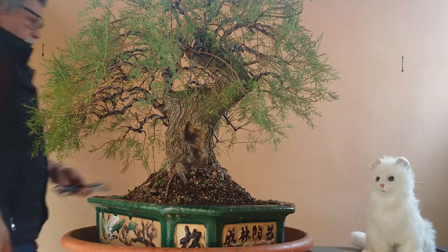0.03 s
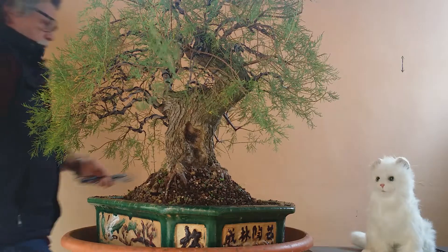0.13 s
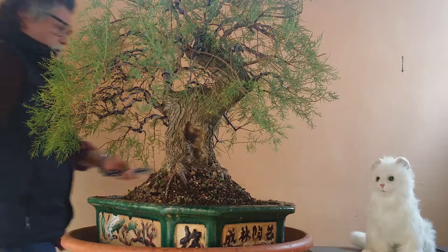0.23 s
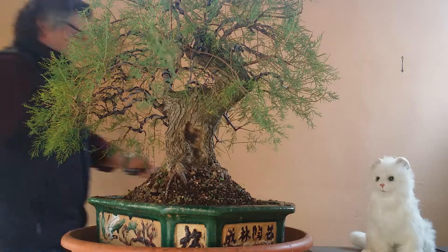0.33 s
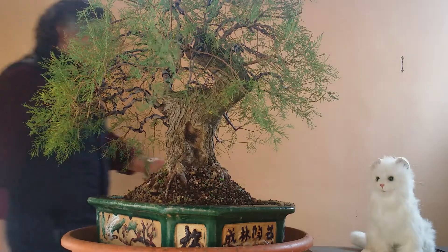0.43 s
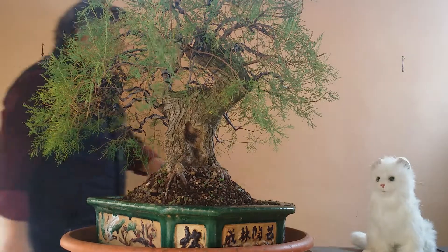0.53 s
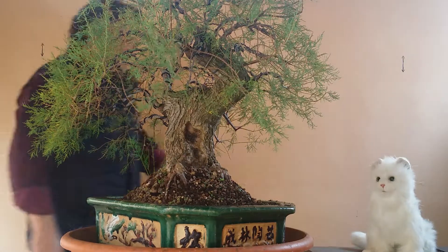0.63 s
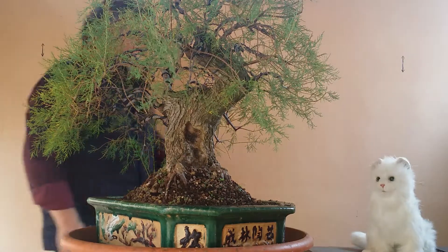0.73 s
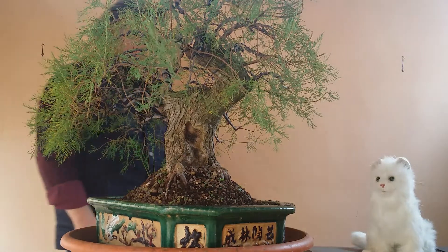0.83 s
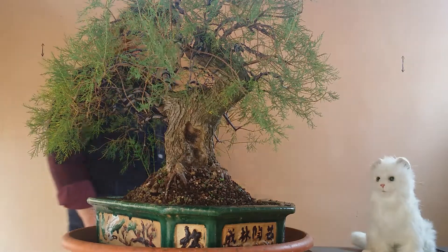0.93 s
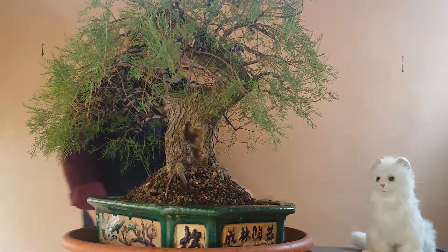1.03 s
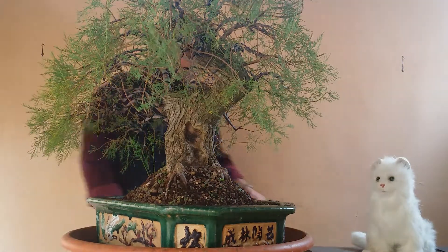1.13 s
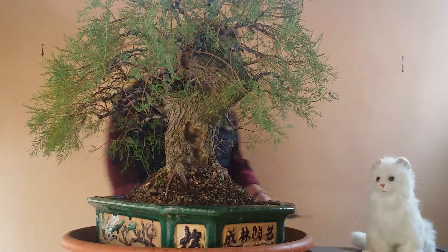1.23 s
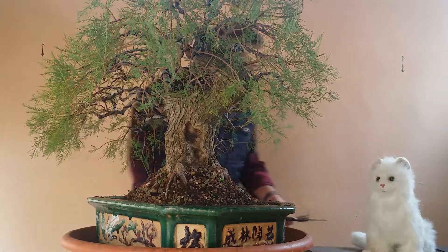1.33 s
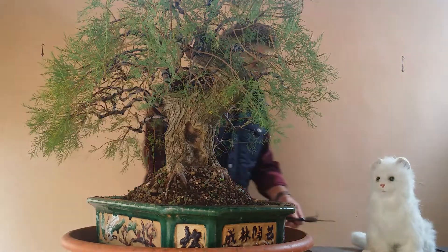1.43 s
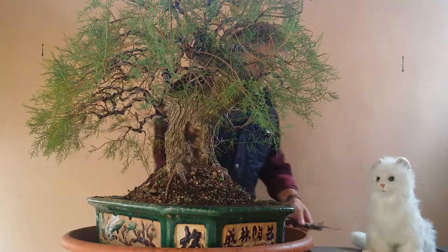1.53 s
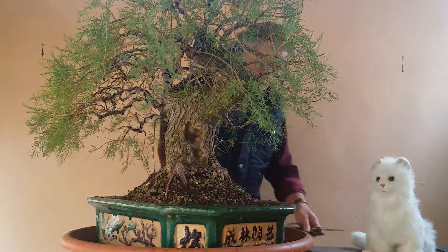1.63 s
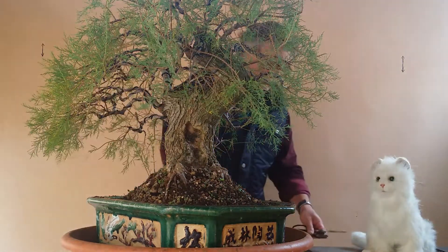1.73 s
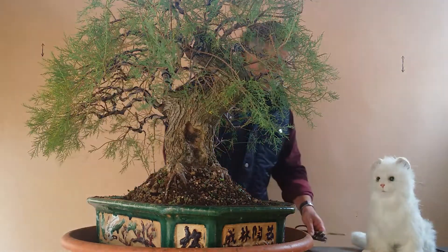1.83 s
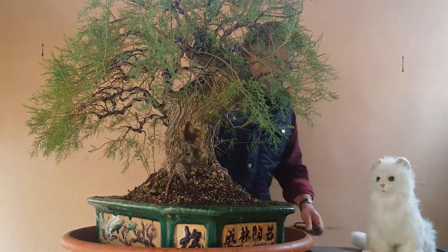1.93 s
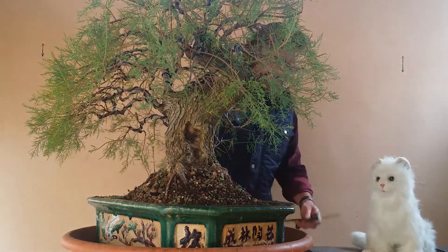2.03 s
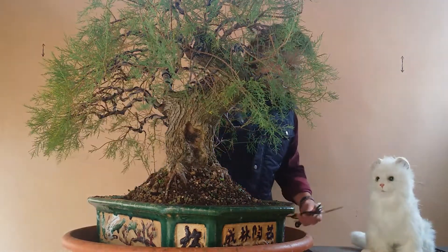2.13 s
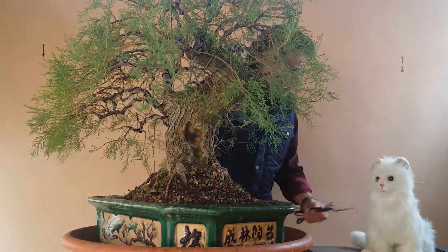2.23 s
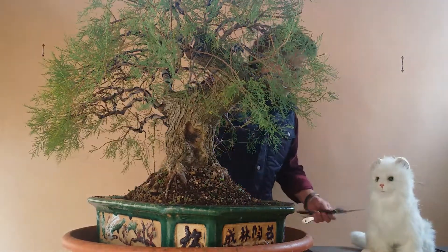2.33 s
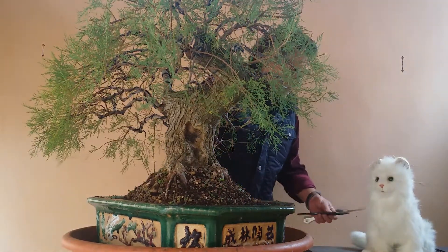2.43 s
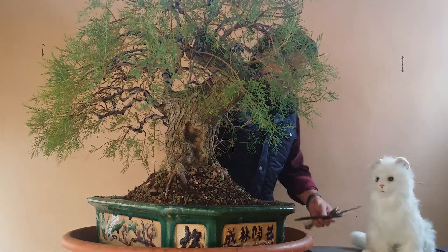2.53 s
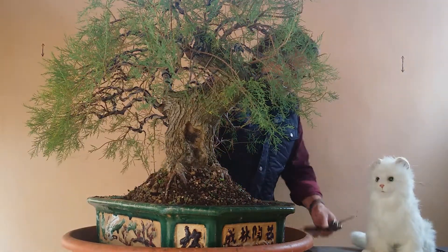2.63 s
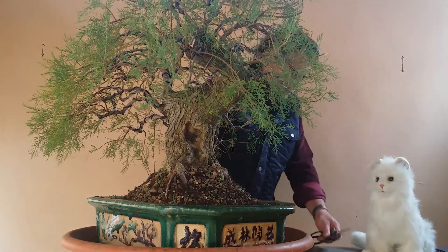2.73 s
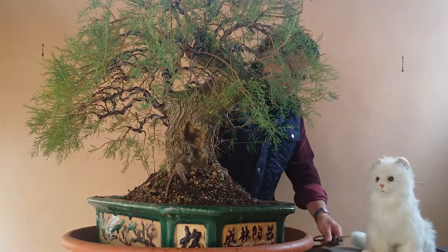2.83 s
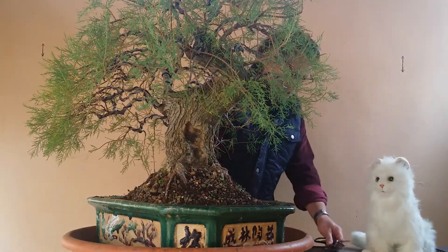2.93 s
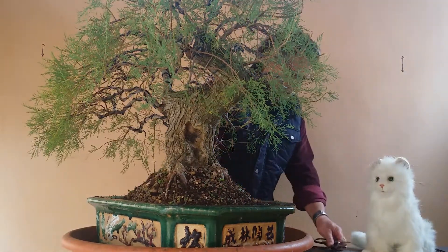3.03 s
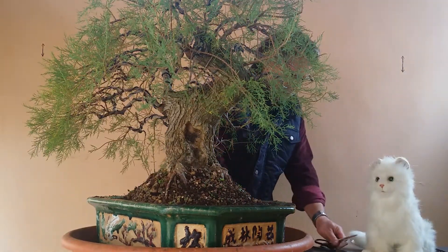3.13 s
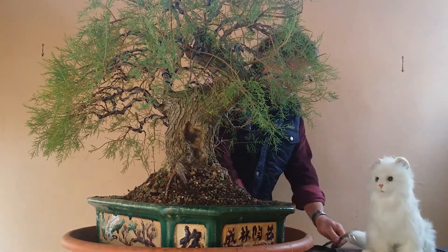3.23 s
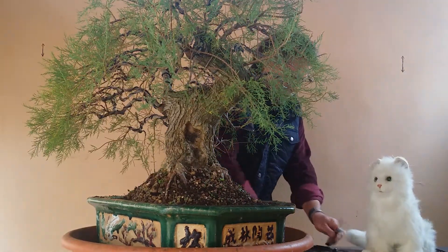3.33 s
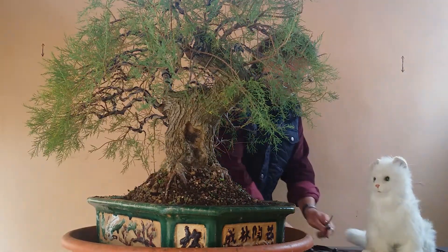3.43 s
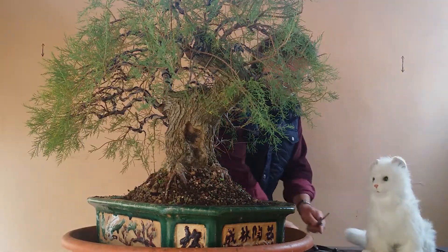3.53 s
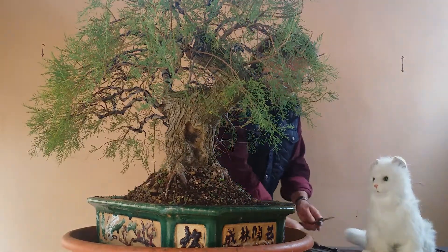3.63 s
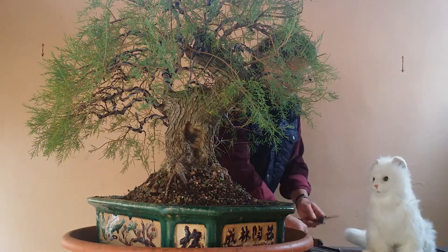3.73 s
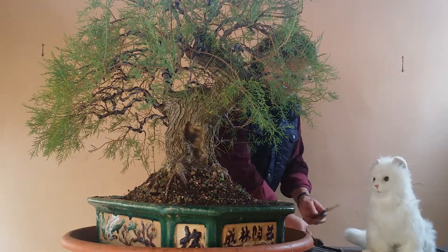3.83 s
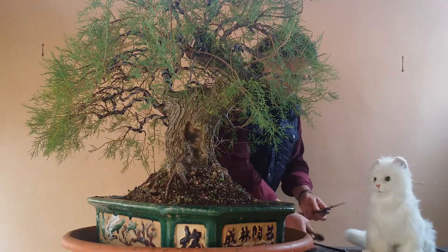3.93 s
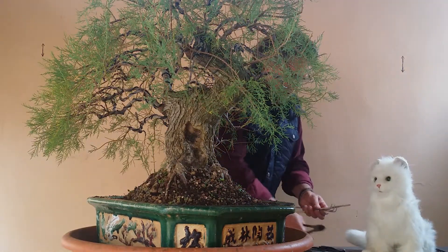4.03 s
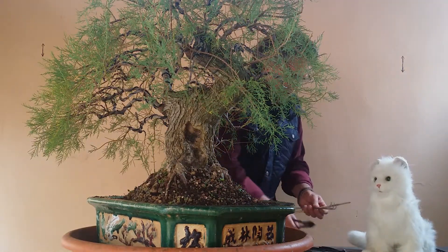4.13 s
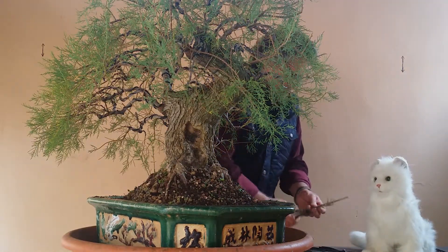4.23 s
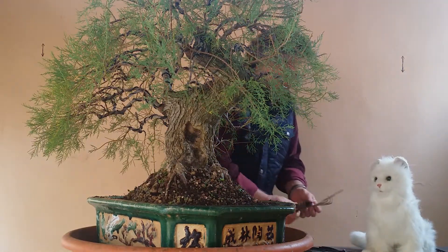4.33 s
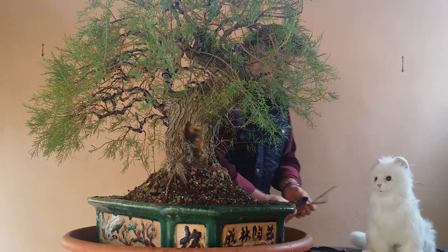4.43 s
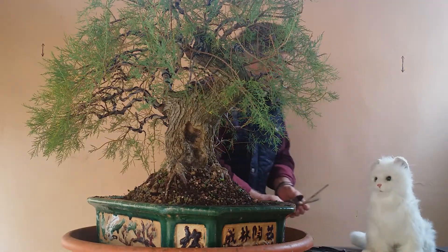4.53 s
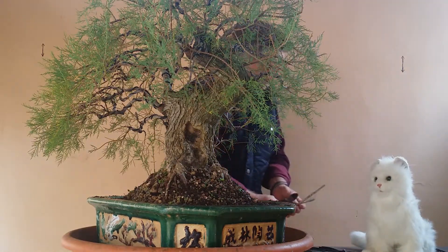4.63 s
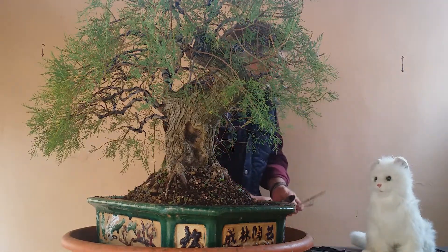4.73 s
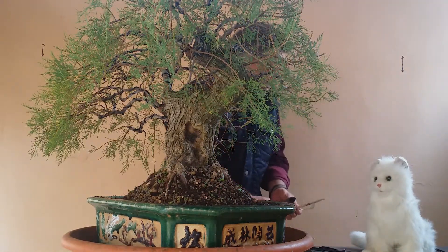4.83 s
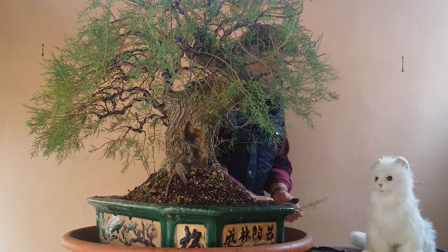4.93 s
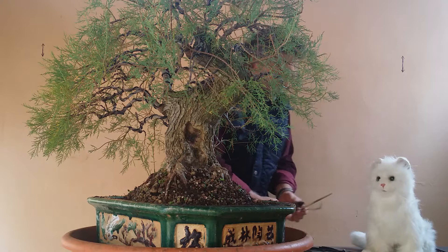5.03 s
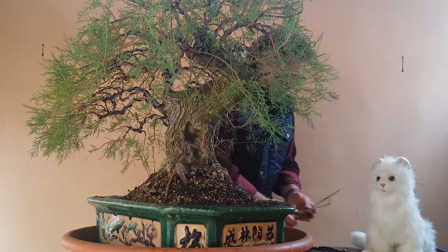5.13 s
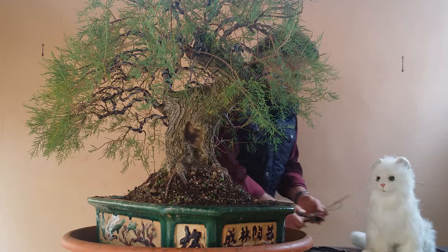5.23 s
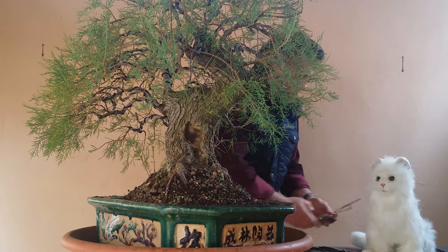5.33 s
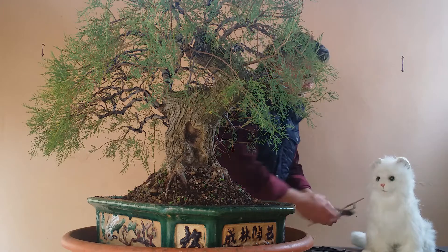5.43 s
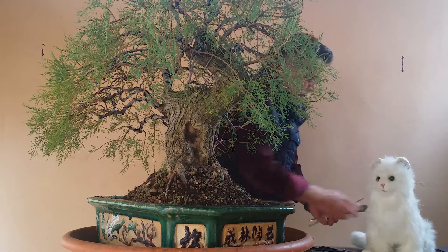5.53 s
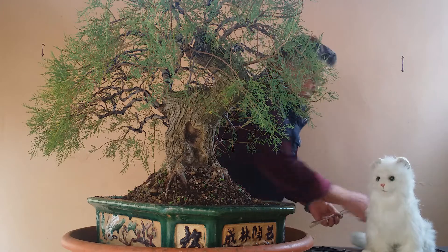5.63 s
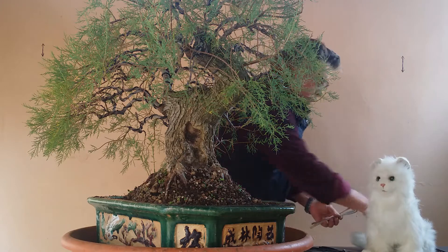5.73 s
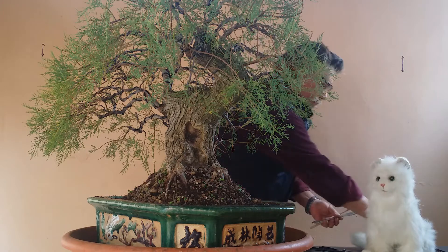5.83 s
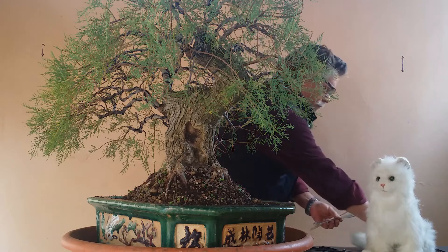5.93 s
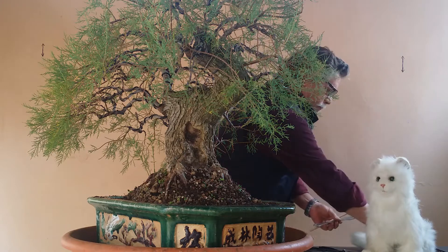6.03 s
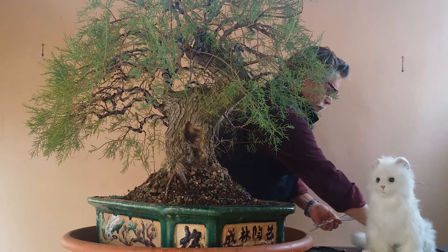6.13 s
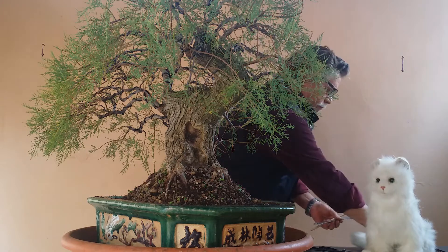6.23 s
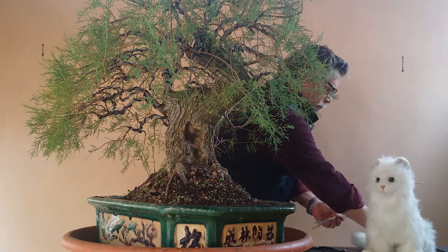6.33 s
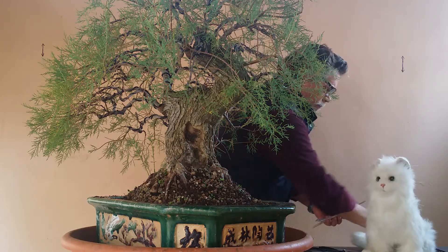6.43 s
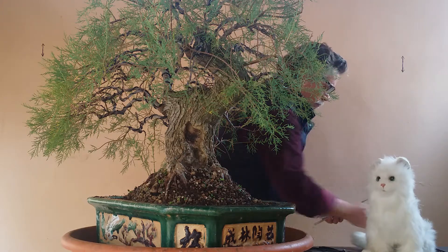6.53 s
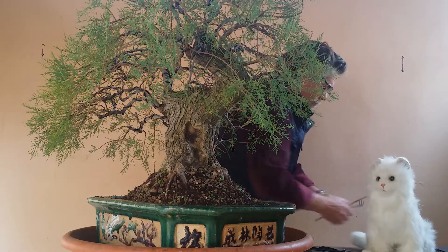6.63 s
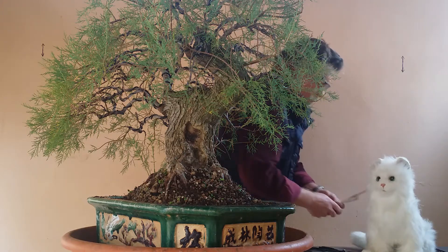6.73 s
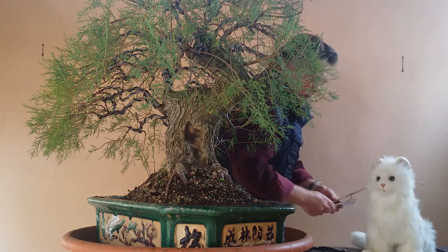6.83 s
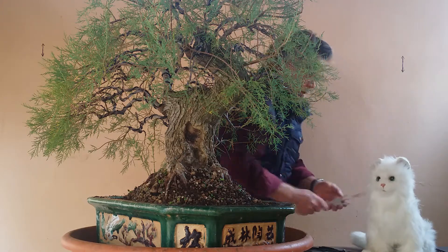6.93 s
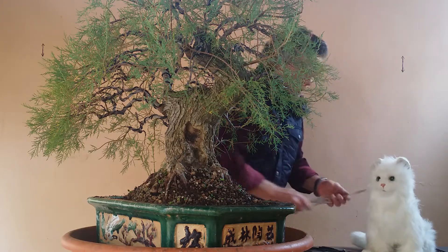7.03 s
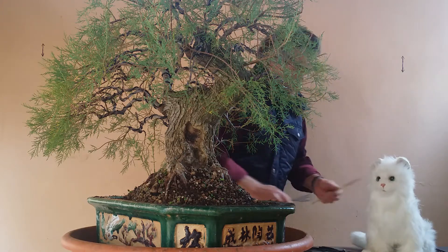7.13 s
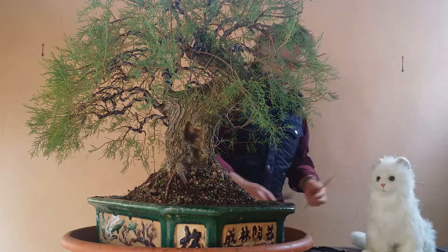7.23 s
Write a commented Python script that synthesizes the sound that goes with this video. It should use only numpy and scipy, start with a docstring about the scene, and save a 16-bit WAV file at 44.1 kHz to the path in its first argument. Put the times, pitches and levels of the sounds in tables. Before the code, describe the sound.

Steel pruning shears clink in the hand, then tools knock and rattle onto a wooden table at uneven gaps, ending with one heavy thud.

```python
"""A small, bare-walled room with a wooden table: steel pruning tools are carried in, picked up and set down.
Blades clink in the hand as damped steel modes; tools knock, chatter and ring the tabletop, one with a heavy thud.
A hand bumps the table and a sleeve rubs the plant pot, as shaped noise with a few singing tones.
Rumble, clothing and hiss run beneath; two spaced microphones hear it all, a little from their right."""
import sys
import numpy as np
from scipy import signal
from scipy.fft import rfft, irfft, next_fast_len
from scipy.io import wavfile
from scipy.ndimage import map_coordinates

SR = 44100
rng = np.random.default_rng(int(sys.argv[2]) if len(sys.argv) > 2 else 0)


def unload_wav(signal):
    """Save mono or channel-first audio to the path in sys.argv[1] as 16-bit WAV at rate SR, clipped to [-1, 1]."""
    wavfile.write(
        sys.argv[1],
        SR,
        np.round(np.clip(np.atleast_2d(signal).T, -1, 1) * 32767).astype(np.int16),
    )


N = 321841
PULSE_SAMPLES = 16384  # length of every struck sound
HZ = np.fft.rfftfreq(PULSE_SAMPLES, 1 / SR)
T_S = np.arange(PULSE_SAMPLES) / SR

# Spectra and mode strengths count only relative to each other: the sounds made from them are normalized.

# Room rumble. Each row: frequency in Hz, density in dB per Hz.
RUMBLE_SPECTRUM = [(12, -36), (20, -14), (37, 1.5), (49, -13.5), (82, 2), (129, -6.5), (178, -3.5),
                   (209, -8.5), (264, -6.5), (370, -13), (450, -16.5), (580, -44), (990, -120)]
# Stir of clothing. Each row: frequency in Hz, density in dB per Hz.
CLOTH_SPECTRUM = [(240, -32), (400, -5), (568, -3.5), (860, -5.5), (980, -4), (2800, -15), (3640, -49),
                  (6160, -120)]
# Steady hiss. Each row: frequency in Hz, density in dB per Hz.
HISS_SPECTRUM = [(1470, -28.5), (2500, -15), (2820, -8.5), (3140, -2.5), (3500, -3), (3610, -2.5),
                 (4750, -2.5), (5620, -5), (6440, 1), (7010, -4), (8740, -7.5), (14900, -13.5),
                 (15500, -15.5)]
# The gardener steps or reaches. Each row: middle in seconds, length in seconds, cloth level in dB.
MOVES = [(0.04, 0.79, -56.5), (0.53, 0.39, -58.5), (1.101, 1.0, -62.5), (3.768, 0.26, -58),
         (3.949, 0.17, -53.5), (4.49, 1, -63)]
RUMBLE_DB, CLOTH_DB, HISS_DB = -58.5, -63, -65.5  # between movements
FOOTFALL_DB, SWISH_DB = 2, -4.5  # rumble and hiss of a movement relative to its cloth

# The shears clink in the hand. Each row: start in seconds, energy in dB.
CLINKS = [(.130, -15), (0.218, -19), (0.834, -21.5), (0.869, -11.5), (1.230, -24.5), (1.674, -27),
          (2.640, -25), (2.880, -31)]
# Modes of the shears' blades. Each row: frequency in Hz, strength in dB, t60 in seconds.
SHEARS_MODES = [(1940, -11.5, .08), (2950, -11, 0.1), (3320, -14.5, .07), (4180, -10, 0.071),
                (5000, -10.5, .08), (5890, 0.5, 0.024), (6940, -10, 0.055), (7700, 1, 0.11),
                (9620, -1, 0.2), (12400, -1.5, .11), (14980, -13, .07)]
# Modes of the scissors' blades. Each row: frequency in Hz, strength in dB, t60 in seconds.
SCISSORS_MODES = [(4770, -15, 0.075), (5530, -6, 0.2), (6890, -2.5, 0.21), (7600, -4, .14),
                  (7680, 2, 0.084), (9170, 0, 0.09), (9950, -6.5, 0.11), (10600, -16, .14),
                  (10850, -2.5, 0.11), (11750, -8, 0.18), (13300, -1.5, 0.13), (14030, -7, .14)]
# A steel edge catching. Each row: frequency in Hz, gain in dB.
EDGE_SPECTRUM = [(300, -23.5), (2000, -14.5), (4000, -4.5), (5500, 2.5), (7400, 0.5), (9000, -4.5),
                 (12000, -8), (15500, -8.5)]
# Ring equals scrape at this energy, and gains this many dB for each dB.
RING_FROM_DB, RING_DB_PER_DB = -14.5, 1.72

# A hand bumps the table. Each row: start in seconds, energy in dB.
BUMPS = [(1.564, -23), (3.544, -14.5), (3.915, -11.5), (4.832, -19.5)]
BUMP_HZ, BUMP_CHATTER, BUMP_BOARD_DB, BUMP_THUD_DB = 720, 2.7, -9.5, -6.5  # soft and dull

# A tool lands on the tabletop. Each row: start in seconds, energy in dB, brightness in Hz,
# chatter amplitude relative to the click, time to settle in seconds, gain per further contact in dB,
# board ring in dB re each contact, table thud in dB re the last contact,
# blade ring in dB re the first contact, tool (0 shears, 1 scissors).
KNOCKS = [ (2.753, -14, 3190, 2.4, .007, 0, 7, -8, -11.5, 0),
          (3.154, -6.5, 1270, 2.1, .015, 0, -2, -4, -8.5, 0),
          (3.251, 3, 2600, 2.2, .0095, 3, -13, -27, -9, 1),
          (3.308, -6.5, 2370, 1.2, .029, -3.5, -3, -1, -8.5, 1),
          (4.055, 5, 3630, 2, .014, -1.6, -9, -11, -4.5, 1),
          (4.095, -2, 2100, 0.71, .012, -1, -6.5, -4, -15.5, 1),
          (6.325, 12, 1700, .05, 0.013, -12, -18, 13, -30, 0),
          (6.3517, 17.5, 2860, 0.12, .022, -3.5, -19.5, -0.5, -30, 0)]
# A hard contact on the wood. Each row: frequency in Hz, gain in dB.
WOOD_SPECTRUM = [(40, -35), (120, -13.5), (290, -9.5), (380, -1.5), (700, -1), (1300, 2.5), (2300, 2.5),
                 (3300, 2), (4600, -0.5), (8000, 0), (15000, -13)]
# Handles clacking on the board. Each row: frequency in Hz, strength in dB, t60 in seconds.
CLACK_MODES = [(748, -4, .24), (959, -2, .24), (1070, -4.5, .2), (1228, 1, 0.23), (1285, -2, 0.19),
               (1466, -8.5, 0.3), (1680, -6.5, .2), (2057, 3, 0.2), (2180, -11, 0.25), (2386, -4.5, .22),
               (2804, -1, 0.16), (3153, 4, 0.22)]
# The tabletop's board. Each row: frequency in Hz, strength in dB, t60 in seconds.
BOARD_MODES = [(123, -14, 0.28), (250.3, -16.5, 0.35), (426, -9, 0.218), (507, 2.5, 0.18),
               (582, -3.5, 0.23), (633.5, -9.5, 0.3), (958, -9, 0.26)]
# The whole table on its legs. Each row: frequency in Hz, strength in dB, t60 in seconds.
THUD_MODES = [(91, -20.5, 0.45), (164, 1, .32), (186, 1.5, .29), (247, -24.5, 0.36), (353.7, -2.5, 0.35),
              (369, -10, 0.27)]
CONTACT_COUNT = 3  # tip, pivot and handles touch in turn
SETTLE_POWER = 1.7  # above 1, the gaps between contacts widen
CHATTER_KEPT = .55  # share left at each further contact
BLADE_LAG_S = .0025  # the blades jolt just after the first contact
SCRAPE_DB, SLIDE_DB = -23.5, 11  # blade scrape re the knock, and its rise per root of chatter

# Cloth rubbing on the pot. Each row: frequency in Hz, density in dB per Hz.
SLEEVE_SPECTRUM = [(150, -10), (400, -3), (1300, -8), (1620, -8), (2000, -8), (3100, -9), (3900, -6),
                   (4700, -9.5), (5180, 1.5), (5500, -8), (6900, -3.5), (8200, -14.5), (12000, -19.5),
                   (15500, -21.5)]
# Narrow tones that sing in the stroke. Each row: frequency in Hz, width in Hz, strength in dB.
SING = [(1630, 66, -1), (5160, 130, 0), (5920, 50, -3)]
SING_DB = -11  # relative to the rubbing
BRUSH_TOUCH_S, BRUSH_ATTACK_S = 4.86, 0.0054  # first touch
BRUSH_FULL_S, BRUSH_HOLD_S, BRUSH_DB = 4.98, 0.067, -44.5  # full pressure
BRUSH_RISE_DB_PER_S, BRUSH_FALL_DB_PER_S = 88, 180

# Echoes off near walls. Each row: right-hand delay in seconds, level in dB re the direct sound,
# left lag in seconds (the left delay is the absolute value of delay plus lag).
WALLS = [(.0053, -1.5, 0.028), (.0075, -9.5, -0.0062), (0.0102, -3.5, -0.01053), (.0131, -9, 0.0075),
         (.0235, -17.5, -0.032)]
# Decay of the room's tail. Each row: frequency in Hz, t60 in seconds.
ROOM_T60 = [(150, 0.74), (500, 0.4), (2000, 0.31), (8000, 0.32), (15000, 0.091)]
MIC_DELAY_S = 0.00046  # sound's travel time between the microphones
SOURCE_LAG_S = 0.00013  # the left microphone hears the table later
BAND_LIMIT_HZ = 15600


def amp(db):
    """Decibels to gain."""
    return 10 ** (np.asarray(db) / 20)


def unit(x):
    """Scaled to rms 1."""
    return x / np.sqrt(np.mean(x ** 2) + 1e-20)


def pulse(x):
    """Scaled to energy 1, averaged over the channels."""
    return x / np.sqrt(np.mean(np.sum(x ** 2, axis=-1)) + 1e-20)


def along(points, hz):
    """Interpolates (Hz, value) points on a log frequency axis."""
    point_hz, value = np.transpose(points)
    return np.interp(np.log(hz + 1), np.log(point_hz + 1), value)


def wobble(rate_hz):
    """A smooth random curve through rate_hz knots a second."""
    knots = rng.standard_normal(int(N * rate_hz / SR) + 4)
    return map_coordinates(knots, [np.arange(N) * rate_hz / SR])


def add(track, start_s, sound):
    """Mixes a sound into the track."""
    start = max(round(start_s * SR), 0)
    track[..., start:start + sound.shape[-1]] += sound[..., :N - start]


def diffuse(size, spectrum=None):
    """Noise from all sides: alike at both microphones in the bass, nearly unrelated in the treble."""
    hz = np.fft.rfftfreq(size, 1 / SR)
    alike = .98 * np.sinc(2 * hz * MIC_DELAY_S)
    colour = 1 if spectrum is None else amp(along(spectrum, hz))
    noise = rfft(rng.standard_normal((2, size)))
    mid, side = noise * colour * np.sqrt([1 + alike, 1 - alike])
    left_late = np.exp(-1j * np.pi * hz * SOURCE_LAG_S)  # half the source lag: leans right
    return irfft([(mid + side) * left_late, mid - side], size)


def rush(spectrum):
    """Steady diffuse noise of rms 1."""
    return unit(diffuse(next_fast_len(N), spectrum)[:, :N])


def click(gain):
    """The shortest causal pulse with this spectrum: minimum phase, by folding the cepstrum."""
    cepstrum = irfft(np.log(np.maximum(gain, 1e-6)))
    cepstrum[1:PULSE_SAMPLES // 2] *= 2
    cepstrum[PULSE_SAMPLES // 2 + 1:] = 0
    return irfft(np.exp(rfft(cepstrum)))


def contact(gain, chatter, t60_s):
    """A click followed by the brief chatter of the touching surfaces."""
    decay = amp(-60 * T_S / t60_s)
    force = chatter * pulse(rng.standard_normal(PULSE_SAMPLES) * decay)
    force[0] += 1
    return pulse(irfft(rfft(force) * rfft(click(gain))))


def ring(modes, attack_s, spread_db, detune, buzz):
    """Damped modes; the spot struck changes strength and pitch, and loose parts buzz and blur the upper ones."""
    hz, db, t60_s = np.transpose(modes)[:, :, None]
    strength, pitch = rng.standard_normal((2, len(modes), 1))
    shaken_s = T_S + buzz * np.cumsum(rng.standard_normal(PULSE_SAMPLES)) / SR
    phase = 2 * np.pi * hz * (1 + detune * pitch) * shaken_s
    waves = np.exp(-np.log(1000) * T_S / t60_s) * np.sin(np.float32(phase))
    mix = np.sum(amp(db + spread_db * strength) * waves, axis=0)
    return pulse(mix * (1 - np.exp(-T_S / attack_s)))


def in_room(sound, tail_db, build_s):
    """Direct sound, echoes off the near walls, then a diffuse tail drawn anew each time."""
    hz, t_s, bins = signal.stft(diffuse(PULSE_SAMPLES), SR, nperseg=256)
    decay = amp(-60 * t_s / along(ROOM_T60, hz)[:, None])
    tail = signal.istft(bins * decay, SR, nperseg=256)[1][:, :PULSE_SAMPLES]
    response = amp(tail_db) * pulse(tail * (1 - np.exp(-T_S / build_s)))
    direct = (0.00089, 0.00039, SOURCE_LAG_S)
    for delay_s, db, lag_s in [direct] + WALLS:
        left, right = round(abs(delay_s + lag_s) * SR), round(delay_s * SR)
        response[[0, 1], [left, right]] += amp(db)
    return pulse(signal.fftconvolve(sound[None], response, axes=1)[:, :PULSE_SAMPLES])


def background():
    """Room rumble, the soft stir of clothing and a steady hiss; each movement swells all three."""
    t_s = np.arange(N) / SR
    stir = sum(amp(db) * np.cos(np.pi * np.clip((t_s - middle_s) / length_s, -.5, .5))
               for middle_s, length_s, db in MOVES)
    rumble_level = np.hypot(amp(RUMBLE_DB), amp(FOOTFALL_DB) * stir) * amp(1.8 * wobble(6.7))
    cloth_level = np.hypot(amp(CLOTH_DB), stir) * amp(0.75 * wobble(28))
    hiss_level = np.hypot(amp(HISS_DB), amp(SWISH_DB) * stir) * amp(0.43 * wobble(5))
    rumble = rumble_level * rush(RUMBLE_SPECTRUM)
    cloth = cloth_level * rush(CLOTH_SPECTRUM)
    return rumble + cloth + hiss_level * rush(HISS_SPECTRUM)


def clink(blades, ring_db, scrape_db):
    """Blades and handles touch: an edge catches and the steel rings briefly."""
    steel = ring(blades, attack_s=0.00022, spread_db=5.0, detune=0.0023, buzz=0.035)
    edge = contact(amp(along(EDGE_SPECTRUM, HZ)), chatter=0.94, t60_s=0.039)
    ringing = amp(ring_db) * in_room(steel, tail_db=3.5, build_s=0.003)
    return ringing + amp(scrape_db) * in_room(edge, tail_db=8, build_s=0.0014)


def clinks():
    """The carried shears shift: light touches mostly scrape, firm ones ring."""
    track = np.zeros((2, N))
    for start_s, db in CLINKS:
        ring_db = RING_FROM_DB + RING_DB_PER_DB * (db - RING_FROM_DB)
        add(track, start_s, clink(SHEARS_MODES, ring_db, db))
    return track


def strike(bright_hz, chatter, board_db):
    """One contact with the tabletop, a knock, handle clack and board ring: harder ones are brighter."""
    softness = 1 / np.sqrt(1 + (HZ / bright_hz) ** 5.23)
    hit = contact(amp(along(WOOD_SPECTRUM, HZ)) * softness, chatter, t60_s=0.029)
    knock = in_room(hit, tail_db=6.0, build_s=0.0015)
    # each microphone hears its own mix of the handle modes, but the long waves of the table alike
    clack = np.array([ring(CLACK_MODES, attack_s=.002, spread_db=1.0, detune=0.0014, buzz=0.16)
                      for _ in range(2)])
    clack = amp(-7.5) * irfft(rfft(clack) * rfft(click(softness)))
    board = ring(BOARD_MODES, attack_s=0.0026, spread_db=6.0, detune=0.0042, buzz=0.43)
    return knock + clack + amp(board_db) * board


def thud():
    """Weight comes down and shakes the whole table: low, slowly starting modes."""
    return ring(THUD_MODES, attack_s=0.014, spread_db=2.5, detune=.005, buzz=0.25)


def bumps():
    """A hand meets the table in one soft contact with a thud."""
    track = np.zeros((2, N))
    for start_s, db in BUMPS:
        sound = strike(BUMP_HZ, BUMP_CHATTER, BUMP_BOARD_DB) + amp(BUMP_THUD_DB) * thud()
        add(track, start_s, amp(db) * sound)
    return track


def knocks():
    """A tool settles in a few ever cleaner contacts: the first jolts its blades, the last brings its weight down."""
    track = np.zeros((2, N))
    last = CONTACT_COUNT - 1
    for start_s, db, bright_hz, chatter, settle_s, step_db, board_db, thud_db, ring_db, tool in KNOCKS:
        for k in range(CONTACT_COUNT):
            sound = strike(bright_hz, chatter * CHATTER_KEPT ** k, board_db)
            contact_s = start_s + settle_s * (k / last) ** SETTLE_POWER
            add(track, contact_s, amp(db + k * step_db) * sound)
        add(track, start_s + settle_s, amp(db + last * step_db + thud_db) * thud())
        blades = SCISSORS_MODES if tool else SHEARS_MODES
        scrape_db = SCRAPE_DB + SLIDE_DB * np.sqrt(chatter)
        add(track, start_s + BLADE_LAG_S, amp(db) * clink(blades, ring_db, scrape_db))
    return track


def sleeve():
    """Cloth slides along the pot, its weave catching unevenly: the stroke swells, holds and lifts off."""
    t_s = np.arange(N) / SR
    early_s = np.maximum(BRUSH_FULL_S - t_s, 0)
    late_s = np.maximum(t_s - BRUSH_FULL_S - BRUSH_HOLD_S, 0)
    level_db = BRUSH_DB - BRUSH_RISE_DB_PER_S * early_s - BRUSH_FALL_DB_PER_S * late_s
    touch = np.clip((t_s - BRUSH_TOUCH_S) / BRUSH_ATTACK_S, 0, 1)
    tones = sum(amp(db) / (1 + (2 * (HZ - hz) / width_hz) ** 2) for hz, width_hz, db in SING)
    sing = amp(SING_DB) * rush(np.column_stack([HZ, 20 * np.log10(tones)]))
    return touch * amp(level_db + 1.2 * wobble(180)) * (rush(SLEEVE_SPECTRUM) + sing)


def scene():
    """All layers, each a little louder on the right."""
    events = clinks() + bumps() + knocks() + sleeve()
    return background() * amp([[-.4], [.4]]) + events * amp([[-1.1], [1.1]])


def record(dry):
    """The recorder clips at full scale, then keeps nothing above its band limit."""
    size = next_fast_len(N + PULSE_SAMPLES)
    keep = np.fft.rfftfreq(size, 1 / SR) < BAND_LIMIT_HZ
    return irfft(rfft(np.clip(dry, -1, 1), size) * keep, size)[:, :N]


dry = scene()
out = record(dry)
unload_wav(out)
```